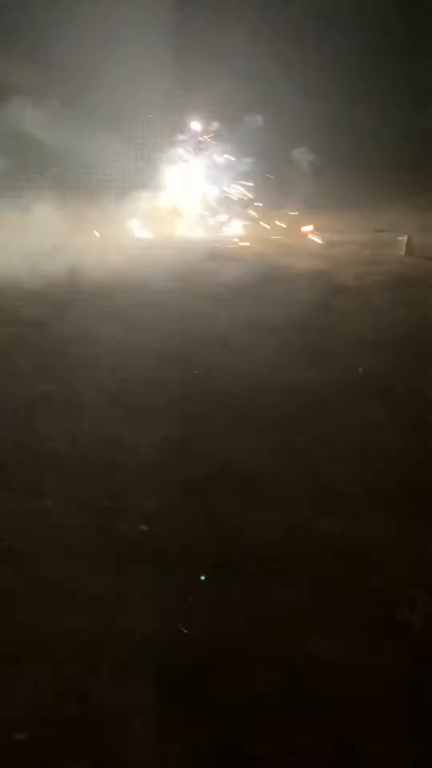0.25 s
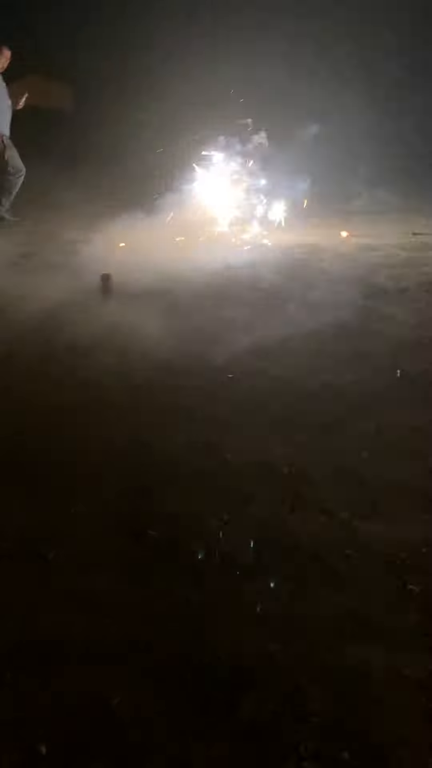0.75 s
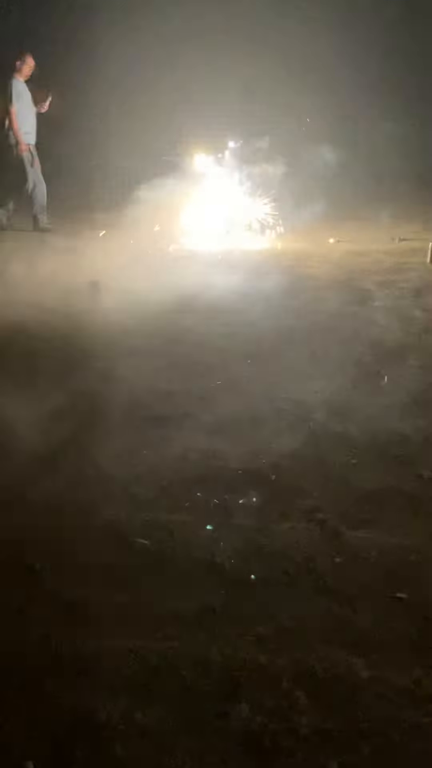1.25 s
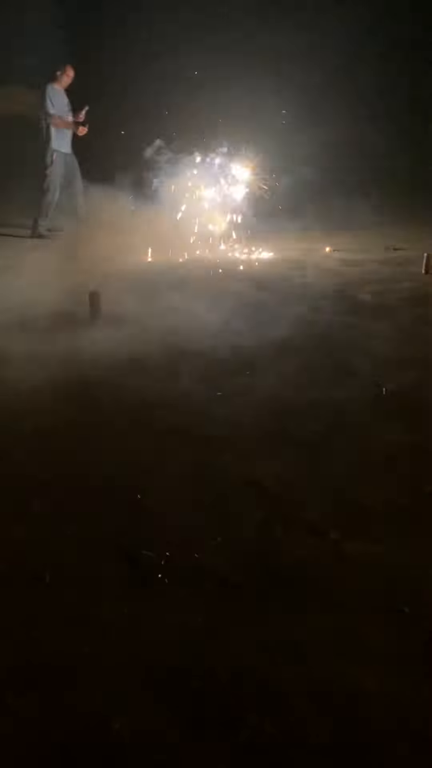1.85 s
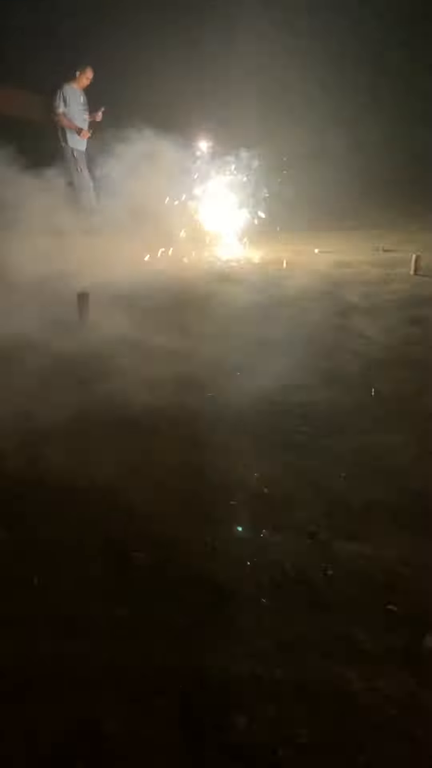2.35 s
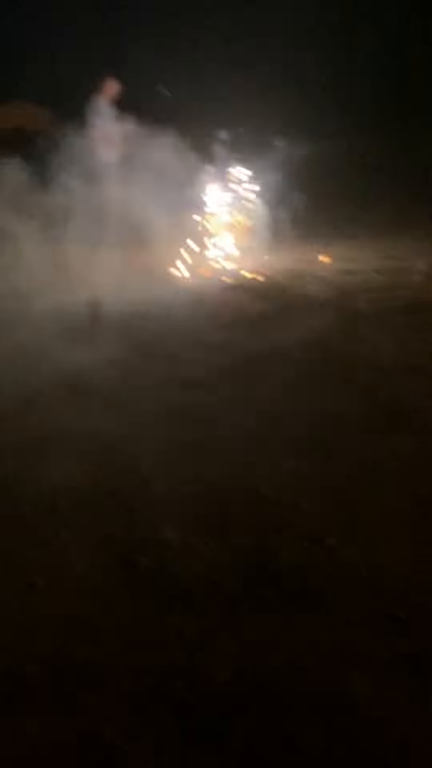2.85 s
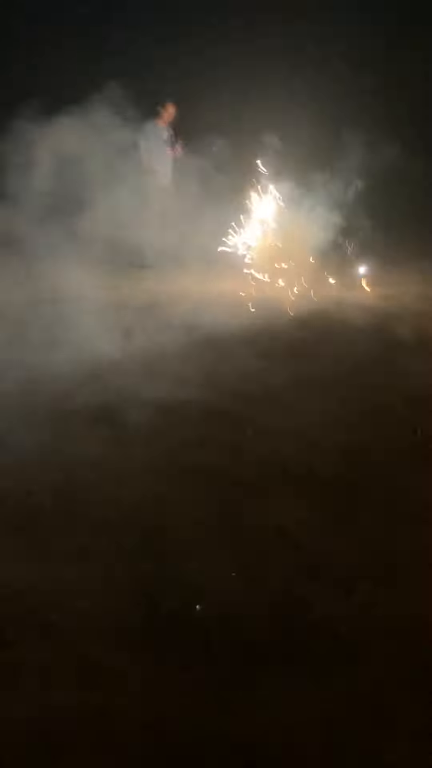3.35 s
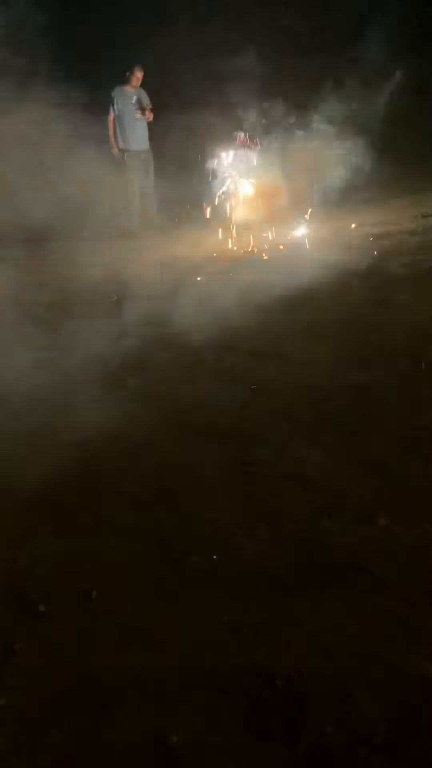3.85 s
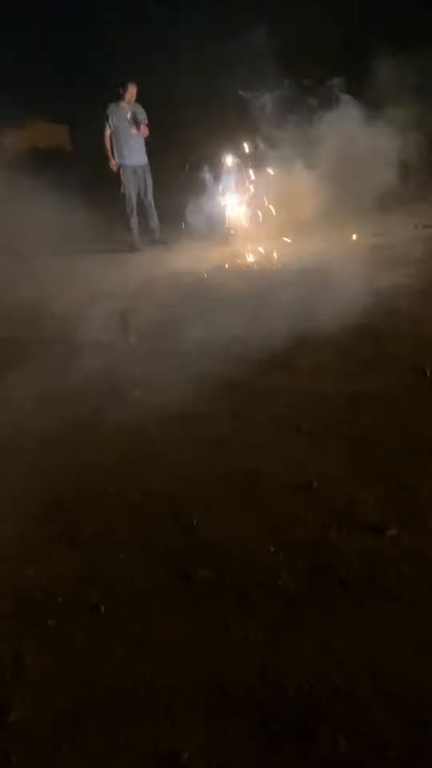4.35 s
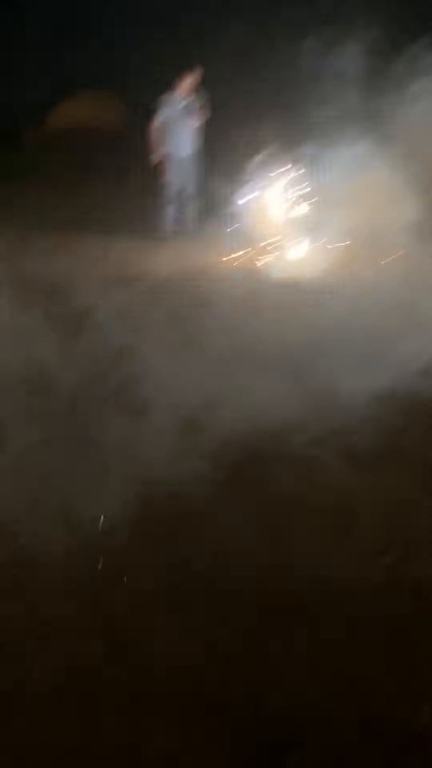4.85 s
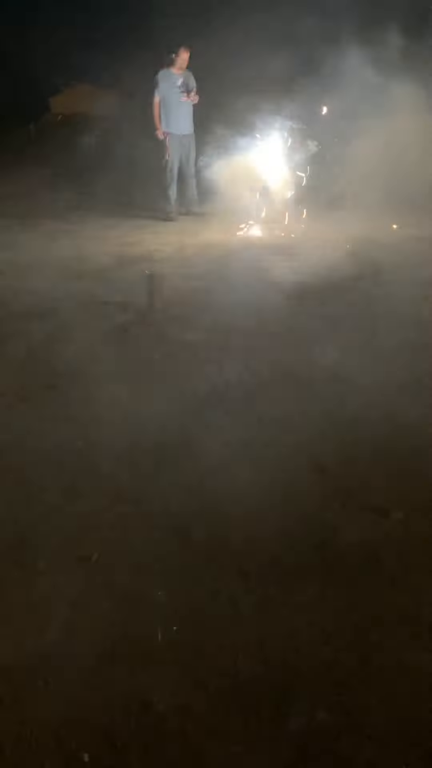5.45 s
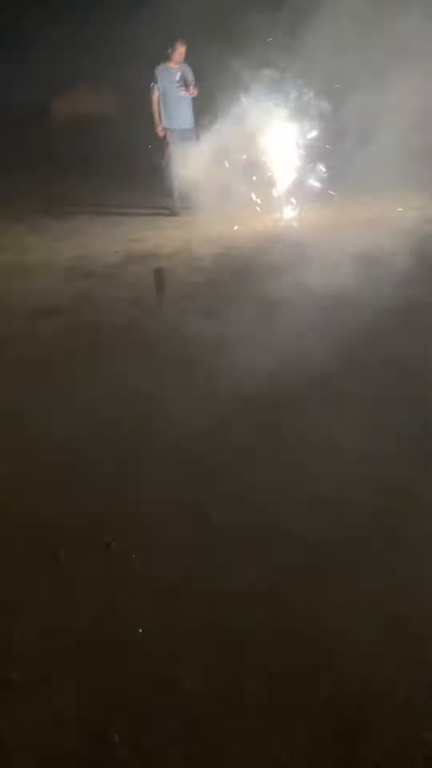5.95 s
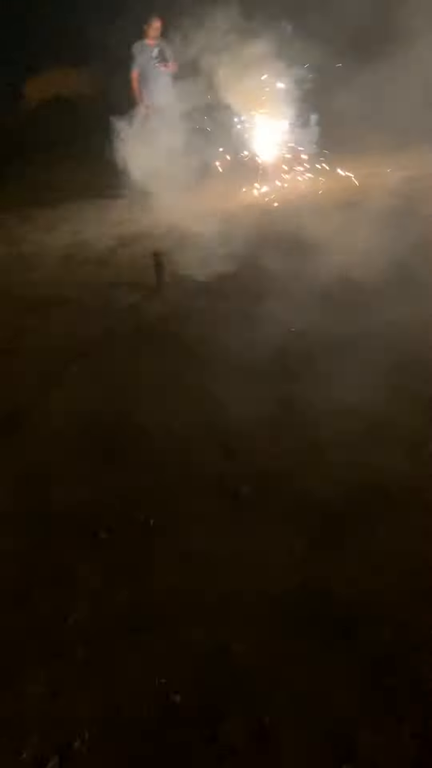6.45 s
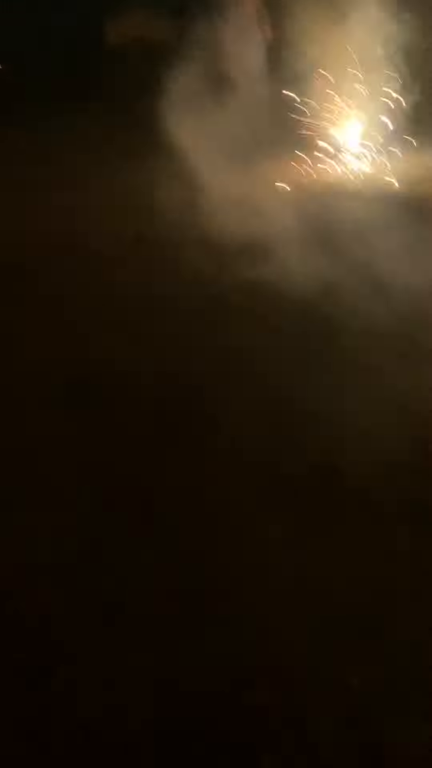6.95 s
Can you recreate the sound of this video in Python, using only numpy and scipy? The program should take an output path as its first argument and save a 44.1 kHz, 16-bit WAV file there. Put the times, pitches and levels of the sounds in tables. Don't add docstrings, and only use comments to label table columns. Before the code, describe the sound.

A fountain firework burns on open ground at night, heard from a few metres away on a hand-held phone. Sharp, bright cracks come in irregular clusters, each with a short snappy body, a small thump and quick scatter. A faint hiss and low rumble run underneath. The crackle thins briefly around four seconds, then becomes densest near six as the hiss surges. The sound stays close, crisp and slightly overloaded.

```python
import sys
import numpy as np
from scipy import signal
from scipy.fft import rfft, irfft, next_fast_len
from scipy.io import wavfile
from scipy.ndimage import uniform_filter1d, minimum_filter1d

SR = 44100
rng = np.random.default_rng(int(sys.argv[2]) if len(sys.argv) > 2 else 0)


def rack_gain(trim_db):
    fader = np.asarray(trim_db, float)
    return 10 ** (fader / 20)


def materialize(psi):
    bounded = np.clip(np.atleast_2d(psi).T, -1, 1)
    quanta = np.round(bounded * 32767).astype(np.int16)
    wavfile.write(sys.argv[1], SR, quanta)


N = 317079

THUMP_REF_DB = -25.5


def evened(x):
    return x / np.sqrt(np.mean(x ** 2) + 1e-20)


def read(points, hz):
    f, value = np.transpose(points)
    return np.interp(np.log(hz + 1), np.log(f + 1), value)


def shaped(x, response):
    size = next_fast_len(N + 8192)
    spectrum = rfft(x, size) * response(np.fft.rfftfreq(size, 1 / SR))
    return irfft(spectrum, size)[..., :N]


def clicks(s, size):
    at = np.asarray(s)[:, None] * SR
    near = np.round(at).astype(int) + np.arange(-8, 9)
    pulse = np.sinc(near - at) * np.hanning(19)[1:-1]
    train = np.zeros(N + 64)
    np.add.at(train, np.clip(near, 0, N), size[:, None] * pulse)
    return train[:N]


def clumpy_pair(length):
    same, grain_db = 0.7, 4.5
    left, other, clumps = rng.standard_normal((3, length))
    clumps = rack_gain(grain_db * evened(uniform_filter1d(clumps, 40)))
    right = same * left + np.sqrt(1 - same ** 2) * other
    return evened(clumps * np.array([left, right]))


def jet():
    # start_s, hiss_db
    jet_level = [
        (0.0, -57.5),
        (2.26, -59),
        (2.38, -57),
        (3.02, -56.5),
        (5.02, -60),
        (5.97, -51),
        (7.19, -57.5),
    ]
    # frequency_hz, level_db
    jet_colour = [(40, 37), (120, 10), (400, 0), (1700, 1), (2500, -4.5), (5000, -7), (14000, -20),
                  (16000, -33)]
    sparks_per_s, spark_spread_db, spark_db = 900, 2.5, -9
    gain_db, sputter_depth_db = 9, 1
    s, level_db = np.transpose(jet_level)
    spark_size = rack_gain(spark_spread_db * np.minimum(rng.exponential(1, N), 4))
    sparks = (rng.random(N) < sparks_per_s / SR) * spark_size
    slow = uniform_filter1d(uniform_filter1d(rng.standard_normal(N), 2000), 2000)
    sputter_db = sputter_depth_db * evened(slow)
    hiss = clumpy_pair(N) + rack_gain(spark_db) * evened(sparks * rng.choice([-1., 1.], N))
    hiss = shaped(hiss, lambda hz: rack_gain(read(jet_colour, hz)))
    return hiss * rack_gain(np.interp(np.arange(N) / SR, s, level_db) + gain_db + sputter_db)


def surroundings(shock, places=8):
    # delay_ms, level_db, fade_ms
    echo_list = [
        (6.77, -19, 0.98),
        (8.34, -23, 0.91),
        (10.6, -17, 2.4),
        (32.44, -18.5, 2.9),
    ]
    debris_db, debris_t60_s = -2, .014
    field_db, field_t60_s = -18.5, 0.24
    t = np.arange(9000) / SR
    debris = rack_gain(debris_db - 60 * t / debris_t60_s) / np.sqrt(debris_t60_s * SR / 14)
    field = rack_gain(field_db - 60 * t / field_t60_s) / np.sqrt(field_t60_s * SR / 14)
    echoes = 0
    for delay_ms, db, fade_ms in echo_list:
        fade = (1000 * t > delay_ms) * np.exp((delay_ms - 1000 * t) / fade_ms)
        echoes = echoes + rack_gain(db) * fade / np.sqrt(fade_ms * SR / 2000)
    envelope = np.sqrt(debris ** 2 + field ** 2 + echoes ** 2) * np.minimum(t / 0.00044, 1)
    place = rng.integers(0, places, N // 64 + 1).repeat(64)[:N]
    scattered = 0
    for k in range(places):
        here = (shock * (place == k))[None]
        scattered = scattered + signal.oaconvolve(here, envelope * clumpy_pair(len(t)), axes=1)[:, :N]
    return scattered


def stars():
    # start_s, peak_db, thump_db
    small_bursts = [(.4991,-13,-46),(.6487,-4.5,-39),(.6698,-5,-43),(.6856,-9.5,-15.5),(.7874,-11,-27.5),(.8934,-4.5,-21),(1.0491,-7,-23),(1.1401,-5,-41),
                    (1.5514,-7,-29.5),(1.6215,-10.5,-24),(1.6392,-5.5,-26),(2.802,-7,-17),(3.255,-3,-25),(3.4097,-2,-47),(3.7036,-7.5,-23),
                    (3.8065,-8,-24.5),(4.217,-3,-34.5),(4.7384,-6,-24.5),(5.0219,-5.5,-10),(5.1504,-3.5,-31),(5.6381,-4,-23),(5.6676,-2,-20),
                    (5.8709,-8.5,-26),(6.1248,-5.5,-23.5),(6.163,-6.5,-19),(6.184,-5,-29),(6.2622,-4.5,-22),(6.5777,-10.5,-17.5),(6.6835,-6,-20.5),(6.8365,-3,-17.5)]
    # start_s, peak_db, thump_db
    crumbs = [(.3395,-10.5,-36),(.5633,-25.5,-40),(.6822,-10,-32),(1.043,-14,-18),(1.1372,-13,-17),(1.4011,-12,-25),(1.7985,-5,-40),
              (2.0674,-32,-17.5),(2.2644,-15.5,-30),(2.3736,-14.5,-45),(2.5549,-21,-24),(2.6277,-16,-60),(3.788,-21,-39),(4.085,-9.5,-28),
              (4.4076,-30.5,-27),(4.4837,-10.5,-16),(4.5195,-16.5,-25),(5.3107,-9,-23.5),(5.3803,-16,-23),(5.5459,-21,-23),(5.6466,-17,-32),
              (5.7859,-7.5,-22),(5.9559,-22,-38),(6.0156,-10,-23),(6.095,-14,-22),(6.2156,-21,-51),(6.6187,-14.5,-16.5),(7.0518,-11,-27),
              (7.0742,-12,-25),(7.0833,-16,-51),(.0192,-20,-25),(.5156,-14.5,-31),(.7852,-45,-33),(1.1575,-18.5,-37.5),(3.8638,-25,-35),
              (5.0083,-20,-35),(5.0321,-10,-31),(5.338,-15,-38),(5.8951,-19,-25),(5.923,-13,-25),(5.9318,-27,-42),(5.9455,-26,-38.5),
              (6.0696,-30,-37),(6.0726,-30,-35),(6.1185,-35,-32),(6.4849,-11,-35),(1.0699,-27,-35),(.2588,-26,-33)]
    # start_s, peak_db, body_db, thump_db
    dull_bursts = [(1.2377,-42,7,-0.5),(1.7547,-20,4,-8),(2.4662,-24,-22,-8),(2.7873,-13,-6,-11.5),(4.6389,-25.5,19.5,-30),(4.6477,-25,8,-10),
                   (5.0205,-34.5,-21,9.5),(5.1,-46,-3,-13),(5.676,-16.5,-20,-15),(5.7673,-13.5,8,-14),(6.0927,-17.5,8.5,-31),(6.269,-26,18,-22),
                   (6.3596,-35,-22,-4.5),(6.9142,-44,-19,1),(6.933,-47.5,-13,14.5),(7.098,-44,10,-24)]
    # start_s, peak_db, body_db, thump_db (last two against the crack)
    clear_stars = [(.1194,-3,-6.5,-17),(.1773,-6,0.5,-13.5),(.5024,0.5,-11,-23.5),(1.0194,-3.5,-13,-36),(1.1629,-3,-6,-21),(1.31,0.5,-10,-34),
                   (1.7521,-11,8.5,-4),(1.9244,-2.5,-39,-20.5),(1.9763,1,-16,-28.5),(2.1644,-3.5,-16,-32),(2.2783,-4.5,-1.5,-29),(2.4157,-2,-16,-29),
                   (2.7584,-3,-2.5,-14.5),(2.9709,-1,-6,-25.5),(3.0244,1,-14.5,-36),(3.0601,0,-9.5,-23.5),(3.4501,-5.5,-9,-49),(3.7315,-2.5,-8.5,-25.5),
                   (4.6363,-16,10.5,0.5),(4.9857,-1,-13.5,-38),(5.0486,1.5,-11,-31),(5.3486,-3,-3,-18),(5.4939,-3,-8.5,-26),(5.7219,-1,-5.5,-15),
                   (5.9899,-0.5,-39,-28),(6.0134,-4,-17,-13.5),(6.1297,2,-25,-29.5),(6.1512,-0.5,-11.5,-30),(6.2703,-3.5,-12,-21.5),(6.3245,1.5,-44,-15)]
    # start_s, peak_db, body_db, thump_db
    high_stars = [(.2018,-3.5,-2,-21),(.3059,-2.5,-11,-21.5),(.6518,-7.5,-3.5,-16),(1.127,-3.5,-5,-21.5),(1.8049,-3,-13.5,-27),(1.9052,-5.5,-6.5,-25),
                  (2.2799,1,-34,-22),(2.6454,-1.5,-4,-17.5),(3.0801,1,-16,-22.5),(3.2606,-1.5,-10.5,-33),(3.3499,-3.5,-5,-28),(3.3935,-2.5,-4.5,-23),
                  (3.4227,-3,-12.5,-55),(3.6577,-2,-13.5,-37),(3.9353,-3.5,-11.5,-29),(4.2151,-5,-7.5,-38),(4.5462,-3,-4,-29),(4.8497,-1,-11,-27),
                  (5.188,-2.5,-11,-58),(5.4049,-0.5,-5,-23),(5.77,-3.5,-3.5,-17.5),(5.8606,-2.5,-5,-23),(5.9132,-1,-14.5,-32.5),(6.0575,-7,-27,-25),
                  (6.2938,-4,-7,-25.5),(6.8052,-4.5,-13,-26.5)]
    # start_s, peak_db, body_db, thump_db
    middle_stars = [(.3344,-2,-10,-25),(.4293,-3,-14,-29.5),(.8222,-2.5,-6.5,-33),(.8663,-0.5,-22,-28),(.8856,-0.5,-8,-21),(1.038,-3,-6.5,-25.5),
                    (1.3405,0.5,-13,-26),(1.4451,-1.5,-6.5,-19),(1.6797,-0.5,-8.5,-23.5),(1.8322,-2,-9.5,-39),(2.1984,-3,-3,-16),(2.5727,-2,-10.5,-23),
                    (2.66,-2.5,-9,-24),(2.8744,-1,-19,-35),(2.9751,-3.5,-8.5,-19),(3.7546,-2.5,-5.5,-22),(4.1097,0.5,-10,-27),(5.3509,-5.5,-4,-44),
                    (5.4546,-3.5,-3,-23.5),(5.7534,-1.5,-8.5,-27),(5.964,-6,-5.5,-23),(6.0862,1,-9,-22),(6.2819,-1.5,-7,-22),(6.4481,-3.5,-5.5,-22),
                    (6.4971,-4,-20,-24.5),(6.6512,-4,-3,-16),(6.6808,-3,-12,-26),(6.7928,-5,-9,-23.5)]
    # start_s, peak_db, body_db, thump_db
    low_stars = [(.001,-2.5,-14,-14.5),(.1163,-6,-2,-22),(.2266,-1,-10,-21),(.2944,-2,-11,-20),(.6102,-3.5,-14.5,-23.5),(1.2982,-2.5,-5.5,-13),
                 (1.8415,-3,-6.5,-17),(2.2109,-1.5,-8,-18.5),(2.3325,-3.5,-10.5,-25),(2.3954,-2.5,-9,-14.5),(2.4803,-3.5,-7,-17.5),(2.5248,-6,-2,-8),
                 (2.5351,0,-8,-28),(3.8737,-6.5,1,-17.5),(3.9465,-8,2.5,-13),(4.5568,-2.5,-2,-18.5),(5.3037,-2,-12,-26.5),(5.4778,-2.5,-5,-24),
                 (6.1647,0,-29,-23),(6.4746,-1,-13,-20),(6.8592,-1,-10,-19),(6.9764,-4.5,-4.5,-12)]
    small_body_db, body_per_thump = -10.5, 0.55
    height_spread, bounce_spread_db = 0.32, 5.5
    phone_height_m, distance_m, sound_m_per_s = 1.4, 6, 343

    small = list(dull_bursts)
    for s, peak_db, thump_db in list(small_bursts) + list(crumbs):
        body_db = small_body_db + body_per_thump * (thump_db - THUMP_REF_DB)
        small.append((s, peak_db, body_db, thump_db))
    kinds = [(clear_stars, (0.448, -10)), (high_stars, (0.485, -0.83)), (middle_stars, (0.358, -0.93)),
             (low_stars, (0.242, -2.3)), (small, (0.345, -5.5))]
    rows = [(*star, *where) for kind, where in kinds for star in kind]
    s, peak_db, body_db, thump_db, height_m, bounce_db = np.transpose(rows)
    chance = rng.random((len(s), 2)) - .5
    height_m = height_m * (1 + height_spread * chance[:, 0])
    lag_ms = 2 * height_m * phone_height_m / distance_m / sound_m_per_s * 1000
    return s, peak_db, lag_ms, bounce_db + bounce_spread_db * chance[:, 1], body_db, thump_db


def bursts():
    # start_s, knock_db
    knock_level = [(0, -25), (.4, 4.5), (1.2, 0), (1.8, -4.5), (2.6, -1), (3.3, 0), (4, 13), (4.6, 12.5),
                   (5.2, 11), (6, 14), (6.6, 4.5), (7.19, 11)]
    # frequency_hz, level_db
    far_colour = [(300, 4.5), (3000, 0), (8000, -6), (15000, -10.5)]
    crack_db, body_ref_db, grass_db = 5, -11.5, -4
    knock_hz, thump_hz, body_hz = 713, 896, 4140
    rupture_ms, rupture_db = 0.11, -8.5
    tube_ms, tube_db = 0.921, -10
    shard_count, shard_ms, shard_db = 3, 1.6, -6.5
    s, peak_db, lag_ms, bounce_db, body_db, thump_db = stars()
    size = rack_gain(peak_db + crack_db)
    body_share, thump_share = rack_gain(body_db - body_ref_db), rack_gain(thump_db - THUMP_REF_DB)
    torn = rng.random((len(s), 3))
    second_s = s + rupture_ms / 1000 * (.5 + torn[:, 0])
    second = -rack_gain(rupture_db) * torn[:, 1]

    def fronts(a, soak_db=0):
        bounce = clicks(s + lag_ms / 1000, a * rack_gain(bounce_db + soak_db))
        return clicks(s, a) + clicks(second_s, a * second) + bounce

    deep = lambda hz: 1 / (1 + (hz / knock_hz) ** 6)
    low = lambda hz: 1 / (1 + (hz / thump_hz) ** 6)
    high = lambda hz: 1 / (1 + (body_hz / (hz + 1)) ** 4)

    crack = shaped(fronts(size, grass_db), high)

    body_size = size * body_share
    tube_size = rack_gain(tube_db) * body_size * np.sign(torn[:, 0] - .5)
    tube = clicks(s + tube_ms / 1000 * (.5 + torn[:, 2]), tube_size)
    late = rng.random((len(s), shard_count))
    snap = rng.standard_normal((len(s), shard_count))
    shard_s = s[:, None] + shard_ms / 1000 * late
    shards = clicks(shard_s.ravel(), (rack_gain(shard_db) * body_size[:, None] * snap).ravel())
    body = shaped(fronts(body_size) + shards + tube * [[1], [-1]], lambda hz: 1 - low(hz) - high(hz))

    push = -size * thump_share
    knock = push * rack_gain(np.interp(s, *np.transpose(knock_level)))
    thump = shaped(clicks(s, push), deep) + shaped(clicks(s, knock), lambda hz: low(hz) - deep(hz))

    charge = (1 + body_share + thump_share) / 3
    shock = shaped(clicks(s, size * charge), lambda hz: rack_gain(read(far_colour, hz)))
    return crack + body + thump + surroundings(shock)


def scene():
    # start_s, palm_db, finger_db
    hand_shade = [(0, 13.5, 0.5), (.3, 5, 1.5), (.6, 1, -7), (1, -6, 2), (1.4, -1, -3), (1.75, 4.5, 0.5),
                  (2.2, 4, -1.5), (2.7, 5, -1.5), (3.1, -3, 4.5), (3.6, -1, 3), (4.1, -8.5, -5.5),
                  (4.5, 0, 2.5), (4.9, -3, 5), (5.4, -17, -3.5), (6, -3, 7), (6.35, 2, 2), (6.65, -2.5, -9),
                  (7.19, 9, 0)]
    palm_hz, finger_hz, width_hz = 950, 1220, 100
    plume = bursts() + jet()
    s, *shades_db = np.transpose(hand_shade)
    for dip_hz, shade_db in zip((palm_hz, finger_hz), shades_db):
        dip = shaped(plume, lambda hz: np.exp(-.5 * ((hz - dip_hz) / width_hz) ** 2))
        plume = plume + dip * (rack_gain(np.interp(np.arange(N) / SR, s, shade_db)) - 1)
    return plume


def microphone(hz):
    # frequency_hz, level_db
    broad_colour = [(20, -98), (45, -24.5), (100, -5.5), (220, 1), (400, 1), (1000, -6.5), (1600, -2.5),
                    (3200, -1.5), (4800, 3), (10000, 6), (13000, 2.5), (15500, -4), (16800, -35),
                    (17300, -66)]
    # frequency_hz, width_hz, level_db
    resonances = [(530, 100, -5), (730, 160, 3.5), (920, 140, -5), (1170, 130, 3), (2160, 200, -6),
                  (2470, 220, 8), (2740, 110, -4), (5600, 600, -2.5)]
    # frequency_hz, lag_ms
    bass_lag = [(60, 9), (150, 8), (300, 6.5), (600, 4.5), (950, 4.5), (1150, 0.56), (1800, -0.23),
                (4000, -0.05), (9000, 0)]
    bells_db = sum(db * np.exp(-.5 * ((hz - f) / (w / 2)) ** 2) for f, w, db in resonances)
    bells = np.log(rack_gain(bells_db))
    ring = -signal.hilbert(np.r_[bells, bells[-2:0:-1]]).imag[:len(hz)]
    late = -2 * np.pi * np.cumsum(read(bass_lag, hz)) / 1000 * hz[1]
    return rack_gain(read(broad_colour, hz) + bells_db) * np.exp(1j * (ring + late))


def smeared(x):
    smear_db, smear_ms, smear_hz = -14, 6, (900, 4000)
    ms = np.arange(-1000, 1001) / SR * 1000
    cloud = rng.standard_normal((2, len(ms))) * np.exp(-abs(ms) / smear_ms)
    band = signal.butter(2, smear_hz, "bandpass", fs=SR, output="sos")
    cloud = signal.sosfilt(band, cloud) / np.linalg.norm(cloud[0])
    return x + rack_gain(smear_db) * signal.oaconvolve(x, cloud, "same", axes=1)


def masked(mid, side, count=6):
    # frequency_hz, margin_db
    middle_margin = [(1700, 15), (2400, 7), (3100, 3.5), (4400, 2), (5000, -1), (6000, -4), (6500, 5.5),
                     (10000, 5), (10700, -6), (11500, 1), (12800, 3), (14000, 5), (15300, -8)]
    side_margin_db, waver_db = 5.5, 2
    from_hz, floor_db, under_peak_db = 1300, -75, 19
    hz, _, z = signal.stft([mid, side], SR, nperseg=256, noverlap=192)
    blocks = z.shape[-1] // count
    power = abs(z[:, :128, :blocks * count].reshape(2, 32, 4, blocks, count) ** 2)
    power_db = 10 * np.log10(power.mean((2, 4)) + 1e-20)
    loudest_db = 10 * np.log10(power.mean(2).max(-1) + 1e-20)
    nearby_peak_db = -minimum_filter1d(-power_db, 9)
    quiet_db = np.maximum(floor_db, nearby_peak_db - under_peak_db)
    margin_db = [read(middle_margin, hz[2:128:4, None]), np.full((32, 1), side_margin_db)]
    waver = evened(uniform_filter1d(rng.standard_normal((32, blocks)), 4))
    margin_db = margin_db + waver_db * waver
    other_db = uniform_filter1d(power_db[::-1] - power_db, 3)
    keep = (other_db < margin_db) | (loudest_db > quiet_db + 3)
    keep = keep.repeat(4, axis=1).repeat(count, axis=2)
    z[:, :128, :blocks * count] *= np.where(hz[:128, None] > from_hz, keep, 1)
    return signal.istft(z, SR, nperseg=256, noverlap=192)[1][:, :N]


def roll_off(x):
    return signal.sosfilt(signal.butter(12, 17140, fs=SR, output="sos"), x)


def record(dry):
    # frequency_hz, level_db
    beam_width = [(600, -76), (1000, 4.5), (1500, -18.5), (2600, -5), (3800, 6.5), (4900, 2.5), (5600, 8),
                  (6500, -10.5), (13000, -4.5), (16000, -9)]
    # frequency_hz, lead_rad
    left_lead = [(0, 0), (900, .3), (1080, -1.1), (1250, 2.1), (1370, 2.9), (1500, 3.25), (1650, 2.7),
                 (2250, 2.8), (2540, 2.2), (2700, 2.4), (3300, 3.2), (4300, 2.4), (4900, 2.95),
                 (5400, 2.65), (5800, 3.75), (7250, 5), (11700, 9.4), (15500, 12.9), (16500, 12.9)]
    ceiling, edge_hz, mono_hz, leak_db = .81, 17140, 640, -41.5
    mid = (dry[0] + dry[1]) / 2
    side = shaped((dry[0] - dry[1]) / 2, lambda hz: rack_gain(read(beam_width, hz)))
    spread = lambda hz: np.exp(-1j * np.interp(hz, *np.transpose(left_lead)))
    left = shaped(mid + side, microphone)
    right = shaped(mid - side, lambda hz: microphone(hz) * spread(hz))
    left, right = smeared(np.clip([left, right], -ceiling, ceiling))
    edge = lambda hz: np.clip((edge_hz - hz) / 500, 0, 1)
    mid = shaped((left + right) / 2, edge)
    side = shaped((left - right) / 2, lambda hz: edge(hz) / (1 + (mono_hz / (hz + 1)) ** 8))
    mid, side = masked(mid, side + rack_gain(leak_db) * mid)
    return roll_off(np.array([mid + side, mid - side]))


dry = scene()
out = record(dry)
materialize(out)
```